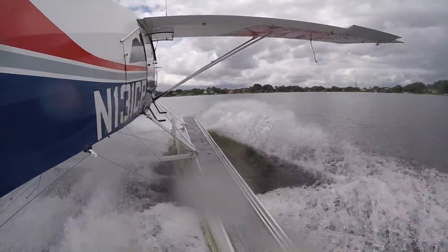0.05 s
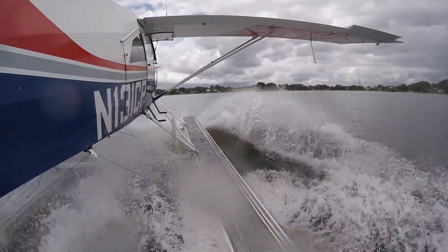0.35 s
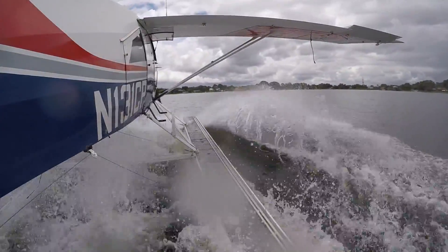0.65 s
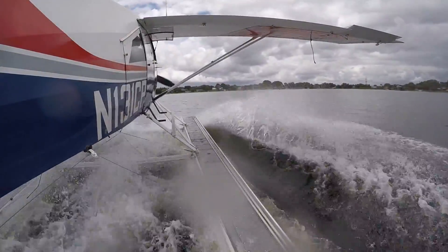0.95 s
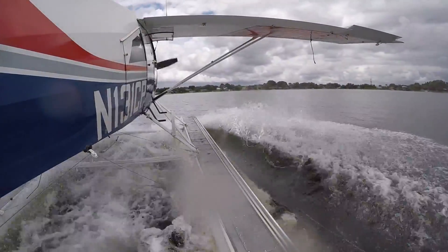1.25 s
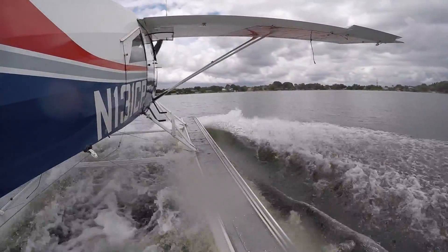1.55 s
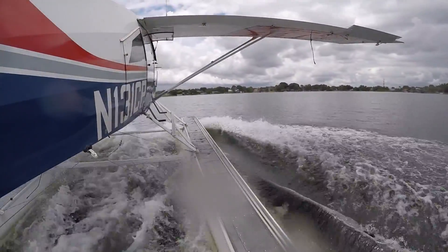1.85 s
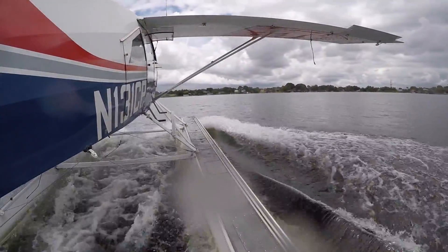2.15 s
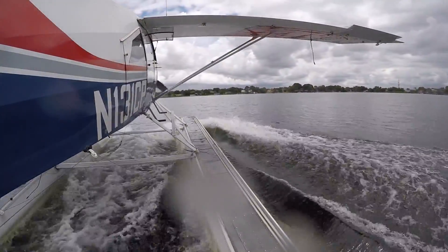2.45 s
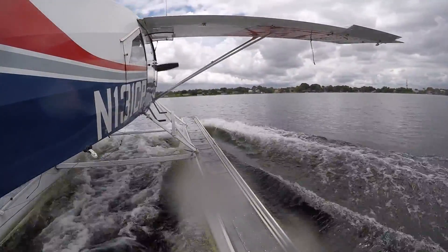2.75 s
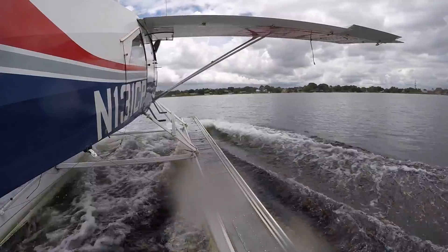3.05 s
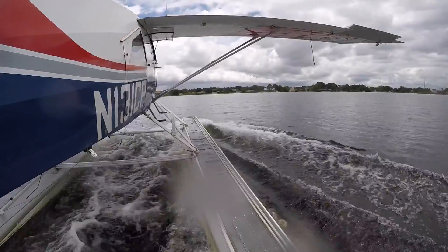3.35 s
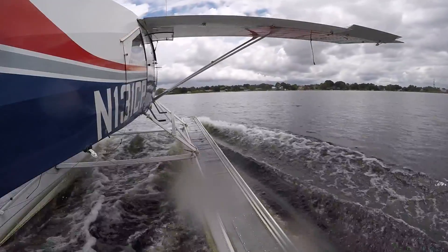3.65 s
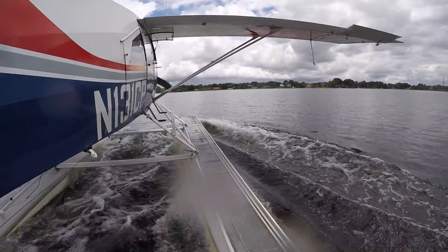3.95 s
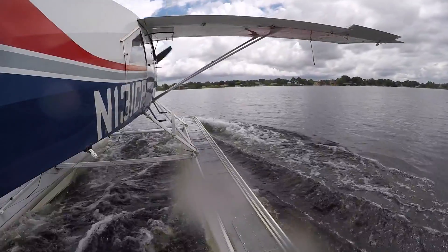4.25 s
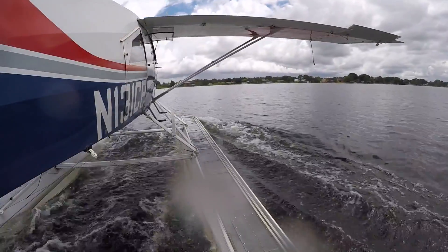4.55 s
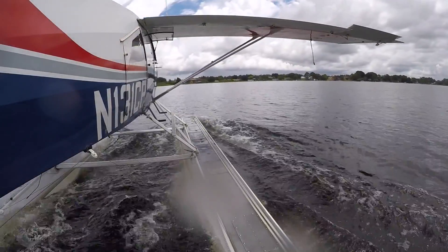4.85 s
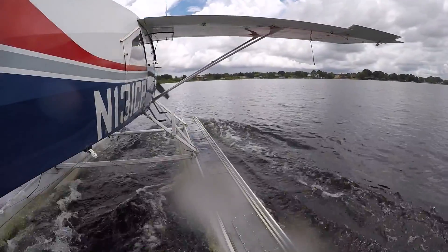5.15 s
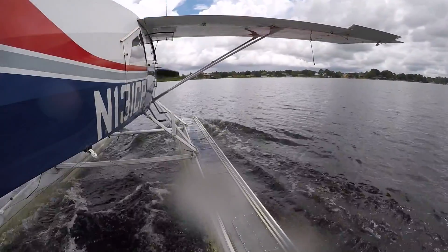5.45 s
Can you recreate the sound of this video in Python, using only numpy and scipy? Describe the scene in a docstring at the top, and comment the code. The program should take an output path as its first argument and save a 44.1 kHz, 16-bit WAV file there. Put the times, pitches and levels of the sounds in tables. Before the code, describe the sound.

A small floatplane skims a lake, heard close from its tail. Spray hisses and water drums on the hollow floats over a low wind rumble. After about a second the spray dies away to a gurgling wash, uncovering the idling piston engine with its throbbing exhaust, dull knocks and metallic valve ticks. Later a hard gust thumps the microphone, followed by a softer one.

```python
"""A floatplane settles on a lake, heard from a camera case on its tail.
First the floats plane: water drums on the hollow hulls, spray hisses off them. From 1.2 s they sink off
the step and the spray dies to a wash, uncovering the idling six-cylinder engine: throbbing exhaust,
dull knocks, valve clatter. Propeller wind buffets the case throughout; near 3.8 s a hard gust thumps
it and the level dips briefly. A softer gust follows at 4.3 s."""
import sys
import numpy as np
from scipy import signal
from scipy.fft import rfft, irfft
from scipy.io import wavfile
from scipy.ndimage import uniform_filter1d, minimum_filter1d

SR = 44100
rng = np.random.default_rng(int(sys.argv[2]) if len(sys.argv) > 2 else 0)


def generate_wav(sig):
    """Save sig (samples, or channels by samples) to the path in sys.argv[1] as 16-bit PCM at SR."""
    pcm = np.round(np.clip(np.atleast_2d(sig).T, -1, 1) * 32767).astype(np.int16)
    wavfile.write(sys.argv[1], SR, pcm)


N = 242991
TIME_S = np.arange(N) / SR
FREQS_HZ = np.fft.rfftfreq(2 * N, 1 / SR)

# Table levels are relative. Spray envelope: t/s, level/dB
SPRAY_FLOW = [(0, -29), (1.15, -30), (1.55, -35), (2.2, -40.5), (3.2, -44), (4.3, -49.5), (5.51, -45.5)]
# Higher sheets of spray: peak t/s, boost/dB, half width/s
SPRAY_SURGES = [(.68, 1.2, .12), (1.24, 2.2, 0.05)]
# Mist and drops: f/Hz, level/dB
SPRAY_SPECTRUM = [(100, -3), (300, -9), (600, -6), (1200, -8.5), (2000, 1), (2700, 4.5), (4000, 3),
                  (5500, -3.5), (7500, -4.5), (10000, -11), (13000, -17), (15500, -18.5)]
# Hollow floats: f/Hz, level/dB
DRUM_SPECTRUM = [(60, -31), (130, 5.5), (190, 0.5), (260, -9), (380, -12), (480, -27), (1000, -36),
                 (3000, -66)]
# Wake envelope: t/s, level/dB
WAKE_FLOW = [(0, -41.5), (1.5, -46.5), (2.8, -48), (4.2, -49), (5.51, -47)]
# Churning water: f/Hz, level/dB
WASH_SPECTRUM = [(100, 0.5), (250, 0), (500, -6.5), (900, -3), (1200, -9.5), (2000, -5.5), (2700, -10.5),
                 (4000, -11.5), (5500, -18.5), (9000, -41), (15500, -54)]
# Engine speed: t/s, speed/rpm
ENGINE_SPEED = [(0, 783.9), (1.3, 782.1), (2.7, 778.6), (4.1, 775.7), (5.5, 780.1)]
# Exhaust and propeller lines: multiple of the four-stroke cycle rate, level/dB
EXHAUST_LINES = [(4, -31.5), (5, -42), (6, -26), (7, -31), (9, -20), (11, -33), (12, -26), (13, -40),
                 (14, -45), (15, -37), (18, -36), (20, -50), (21, -52), (22, -54), (24, -49), (25, -57),
                 (26, -58), (27, -59), (30, -57), (36, -63)]
# Engine knocks: position/cycle, level/dB
KNOCK_PATTERN = [(.15, -1.5), (.265, 1.5), (0.329, -2.5), (0.461, -3), (.555, -8), (.61, -3), (0.684, -5),
                 (.805, -4.5), (0.849, -3.5), (0.982, -4.5)]
# Airframe modes: f/Hz, level/dB, t60/s
AIRFRAME_MODES = [(338, 0, 0.043), (406, 1, 0.045), (408, -4.5, 0.024), (575, -13.5, 0.074),
                  (863, -17.5, 0.075), (980, -15.5, 0.084)]
# Panel buzz: f/Hz, level/dB
PANEL_SPECTRUM = [(200, -33), (290, -11.5), (330, 2.5), (435, 1.5), (470, -21.5), (800, -14), (980, -20.5),
                  (1150, -39)]
# Valve gear blows: position/cycle, level/dB
VALVE_PATTERN = [(0.114, 0), (0.271, 1.5), (.33, 3), (0.448, -1), (0.583, 4), (.635, -11), (.785, -15),
                 (.85, 3), (0.944, 2)]
# Valve clatter: f/Hz, level/dB
CLATTER_SPECTRUM = [(300, -23), (900, -1.5), (1500, -8.5), (2900, -4), (3600, -1.5), (4300, -5.5),
                    (5000, -4), (6500, -12), (8200, -11), (9200, -27.5), (12000, -21.5), (15500, -38)]
# Loose valves: position/cycle, ping level/dB, ping f/Hz, tinkle and click level/dB
TAP_PATTERN = [(.277, -36, 3940, -52), (.612, -40.5, 4110, -57), (.782, -43, 3790, -53)]
# Hardest taps: t/s, ping level/dB, ping f/Hz, tinkle and click level/dB
HARD_TAPS = [(2.2664, -38, 3590, -41), (2.4992, -31, 3990, -54), (2.577, -32, 3940, -43.5),
             (3.0385, -36, 3960, -44), (3.27, -42, 3600, -46), (3.3468, -30, 3880, -52),
             (4.1959, -27.5, 3760, -57), (4.5037, -33.5, 4030, -62), (4.6618, -29, 3990, -58),
             (4.7386, -35, 3680, -55), (4.8135, -33, 3980, -54), (5.1218, -33, 3895, -47)]
# Tap click: f/Hz, level/dB
CLICK_SPECTRUM = [(1000, -38), (4000, -26), (6300, -17), (7400, 5.5), (8400, -10), (9500, 5), (11000, -4),
                  (12500, -16), (15500, -30)]
# Propeller wind: f/Hz, level/dB
BUFFET_SPECTRUM = [(5, -40), (14, -12), (25, -6), (35, -2), (50, 0), (70, -3), (90, -8), (120, -12),
                   (160, -19), (200, -25), (260, -33), (400, -46), (800, -65), (3000, -100)]
# Gusts: peak t/s, level/dB, half width/s
GUSTS = [(3.785, -15.5, 0.077), (4.3, -19, 0.064)]
# Gust rumble: f/Hz, level/dB
GUST_SPECTRUM = [(8, -19), (25, 10), (45, 6), (100, 2), (170, -9), (300, -22.5), (400, -34.5), (700, -64),
                 (3000, -104)]
# Gust thump: f/Hz, level/dB
THUMP_SPECTRUM = [(50, -10), (110, 3), (200, -1), (330, -5), (450, -23), (800, -30), (2000, -63)]
# Case resonances: f/Hz, half width/Hz, gain/dB
CASE_MODES = [(569, 65, 4.5), (857, 26, 4.5), (956, 11, 3), (1374, 43, 3), (2030, 72, 3), (2470, 32, 4),
              (3060, 170, -2.5), (3588, 326, 8), (4108, 330, 9.5), (5030, 280, -1.5), (5730, 190, 1.5),
              (11200, 370, 1.5)]


def spray():
    """Sheets of water tear off the floats into mist and patter back as drops."""
    surge_db = sum(db * swell(s, half_width_s) for s, db, half_width_s in SPRAY_SURGES)
    flow = envelope(SPRAY_FLOW) * gain(surge_db)
    mist = noise(SPRAY_SPECTRUM) * gain(0.93 * drift(rate_hz=18))
    patter = coloured(drops(per_s=2500, spread_db=3), SPRAY_SPECTRUM)
    plinks = bubbles(low_hz=2316, high_hz=8526, per_s=1400, life_cycles=26.4)
    return flow * (gain(-7.5) * mist + gain(-14) * patter + gain(-18.5) * plinks)


def floats(peak_s=0.32, peak_db=-31.5, rise_db_per_s=19, fall_db_per_s=15):
    """Water drums on the hollow floats, swelling, then fading as they slow."""
    since_s = TIME_S - peak_s
    level_db = peak_db + np.minimum(rise_db_per_s * since_s, -fall_db_per_s * since_s)
    return gain(level_db) * noise(DRUM_SPECTRUM)


def wash():
    """The wake churns; large bubbles gurgle, foam fizzes."""
    churn = noise(WASH_SPECTRUM) * gain(0.38 * drift(rate_hz=11))
    gurgle = bubbles(low_hz=702, high_hz=4380, per_s=450, life_cycles=11)
    fizz = bubbles(low_hz=6310, high_hz=8750, per_s=170, life_cycles=40)
    return envelope(WAKE_FLOW) * (churn + gain(-10.5) * gurgle + gain(-14.5) * fizz)


def bubbles(low_hz, high_hz, per_s, life_cycles, sizes=24):
    """Bubbles ring briefly, rising slightly in pitch."""
    sound = np.zeros(N)
    for hz in np.geomspace(low_hz, high_hz, sizes):
        cycles = hz * rng.uniform(0.98, 1.02) * TIME_S[:SR // 20]
        age = cycles / life_cycles
        bubble = (np.exp(-age) - np.exp(-age * 6)) * np.sin(2 * np.pi * cycles * (1 + 0.0055 * age))
        sound += signal.oaconvolve(drops(per_s / sizes, spread_db=3.5), bubble)[:N]
    return unit_rms(sound)


def exhaust(cycles, lag_cycles=0.424, smear_cycles=0.018):
    """Two banks of three cylinders fire in turn; the pipes delay highs more, rounding the pulses."""
    lines = sum(gain(db) * np.cos(2 * np.pi * (k * (cycles - lag_cycles) - smear_cycles * k ** 2))
                for k, db in EXHAUST_LINES)
    return np.sqrt(2) * lines * settle(planing_db=-3, settled_db=1) * gain(0.95 * drift(rate_hz=2.5))


def knocks(cycles, attack_s=0.034):
    """Dull engine blows ring the airframe and buzz its panels."""
    t = TIME_S[:SR // 6]
    modes = sum(gain(db - 60 * t / t60_s) * np.sin(2 * np.pi * hz * t)
                for hz, db, t60_s in AIRFRAME_MODES)
    ring = modes * (1 - np.exp(-t / attack_s))
    blows = each_cycle(cycles, KNOCK_PATTERN, jitter_s=0.0005, uneven_db=2.5)
    ringing = unit_rms(signal.oaconvolve(blows, ring)[:N])
    shaking = rattle(blows, fall_s=0.004, tail_s=0.018, tail_db=-10)
    buzz = coloured(shaking * rng.standard_normal(N), PANEL_SPECTRUM)
    return settle(planing_db=-52, settled_db=-46) * (gain(-7) * ringing + gain(-2.5) * buzz)


def valves(cycles):
    """Rockers and valves clatter in a set order."""
    blows = each_cycle(cycles, VALVE_PATTERN, jitter_s=0.0018, uneven_db=3)
    clatter = rattle(blows, fall_s=0.0089, tail_s=0.047, tail_db=-3.5) * noise(CLATTER_SPECTRUM)
    return settle(planing_db=-47, settled_db=-52.5) * unit_rms(clatter)


def taps(cycles, uneven_db=0.5, tinkle_centre_hz=7970):
    """Loose valves tap each cycle, at times much harder: metallic ping, high tinkle, bright click."""
    soft_taps = [(np.interp(cycle + position, cycles, TIME_S),
                  ping_db + uneven_db * rng.uniform(-1, 1),
                  ping_hz * (1 + 0.0387 * rng.uniform(-0.95, 1)),
                  tinkle_db + uneven_db * rng.uniform(-1, 1))
                 for cycle in range(int(cycles[-1]))
                 for position, ping_db, ping_hz, tinkle_db in TAP_PATTERN]
    ringing, blows = np.zeros(N), np.zeros(N)
    for s, ping_db, ping_hz, tinkle_db in soft_taps + list(HARD_TAPS):
        tinkle_hz = tinkle_centre_hz * (1 + 0.091 * rng.uniform(-0.92, 1))
        ping = steel_ring(ping_hz, fall_s=0.0037, tail_s=0.023, flutter_rad=0.49)
        tinkle = steel_ring(tinkle_hz, fall_s=0.0036, tail_s=0.012, flutter_rad=0.98)
        add(ringing, s, gain(ping_db - 7) * ping + gain(tinkle_db + 1) * tinkle)
        add(blows, s, gain([tinkle_db]))
    click = rattle(blows, fall_s=0.004, tail_s=0.013, tail_db=-11.5) * noise(CLICK_SPECTRUM)
    return ringing + gain(-6.5) * click


def steel_ring(hz, fall_s, tail_s, flutter_rad, attack_s=0.0005):
    """A small steel part rings; phase flutter stands for its close modes."""
    t = TIME_S[:SR // 12]
    shape = (1 - np.exp(-t / attack_s)) ** 2 * decay(t, fall_s, tail_s, tail_db=-15)
    wander = uniform_filter1d(rng.standard_normal(len(t)), size=130)
    wander = unit_rms(uniform_filter1d(wander, size=40))
    return shape * np.sin(2 * np.pi * hz * t + flutter_rad * wander)


def wind(thump_s=3.747):
    """Propeller wake buffets the case; two gusts, the harder landing with a thump."""
    impact = rattle(clicks(np.array([thump_s]), [0]), fall_s=0.014, tail_s=0.05, tail_db=-10)
    thump = coloured(impact * rng.standard_normal(N), THUMP_SPECTRUM)
    buffet = noise(BUFFET_SPECTRUM) * gain(0.57 * drift(rate_hz=3.8))
    gusts = sum(gain(db) * swell(s, half_width_s) for s, db, half_width_s in GUSTS) * noise(GUST_SPECTRUM)
    return settle(planing_db=-19.5, settled_db=-27.5) * buffet + gusts + gain(-49.5) * thump


def settle(planing_db, settled_db, off_step_s=1.177, tau_s=0.88):
    """Gain that holds while the floats plane, then eases as they sink in."""
    planing = np.exp(-np.maximum(TIME_S - off_step_s, 0) / tau_s)
    return gain(settled_db + (planing_db - settled_db) * planing)


def each_cycle(cycles, pattern, jitter_s, uneven_db):
    """Blows repeated each engine cycle, scattered in time and level."""
    position, db = np.transpose(pattern)
    due_cycles = np.arange(int(cycles[-1]) + 1)[:, None] + position
    late, harder = rng.standard_normal((2, *due_cycles.shape))
    times_s = np.interp(due_cycles, cycles, TIME_S, right=2 * TIME_S[-1]) + jitter_s * late
    return clicks(times_s.ravel(), (db + uneven_db * harder).ravel())


def rattle(blows, fall_s, tail_s, tail_db):
    """Envelope of decaying blows, summed in power."""
    shape = decay(TIME_S[:SR // 6], fall_s, tail_s, tail_db)
    return np.sqrt(abs(signal.oaconvolve(blows ** 2, shape ** 2)[:N]))


def decay(t, fall_s, tail_s, tail_db):
    """Sharp fall plus weaker tail."""
    return np.exp(-t / fall_s) + gain(tail_db) * np.exp(-t / tail_s)


def drops(per_s, spread_db):
    """Random impulses, most small, a few large."""
    size = gain(spread_db * np.minimum(rng.exponential(1, N), 5))
    return size * rng.choice([-1, 1], N) * (rng.random(N) < per_s / SR)


def clicks(times_s, db):
    """One impulse per time."""
    samples = np.clip(np.round(times_s * SR).astype(int), 0, N)
    return np.bincount(samples, gain(db), N + 1)[:N]


def noise(spectrum):
    """Shaped noise, rms 1."""
    return coloured(rng.standard_normal(N), spectrum)


def coloured(x, spectrum):
    """x shaped by a spectrum, rms 1."""
    hz, db = np.transpose(spectrum)
    return unit_rms(filtered(x, np.interp(np.log(FREQS_HZ + 1), np.log(hz), db)))


def filtered(x, db):
    """Minimum-phase filter, gain db at FREQS_HZ."""
    log_gain = np.log(gain(np.r_[db, db[-2:0:-1]]))
    phase_rad = -signal.hilbert(log_gain).imag[:len(db)]
    return irfft(rfft(x, 2 * N) * gain(db) * np.exp(1j * phase_rad))[:N]


def drift(rate_hz):
    """Random wander below rate_hz, rms 1."""
    return unit_rms(irfft(rfft(rng.standard_normal(2 * N)) / (1 + (FREQS_HZ / rate_hz) ** 4))[:N])


def swell(peak_s, half_width_s):
    """Gaussian bump, height 1."""
    return np.exp(-((TIME_S - peak_s) / half_width_s) ** 2)


def envelope(points):
    """Gain per sample from t/s, level/dB."""
    return gain(np.interp(TIME_S, *np.transpose(points)))


def add(mix, start_s, sound):
    """Mix in at start_s."""
    part = mix[round(start_s * SR):][:len(sound)]
    part += sound[:len(part)]


def gain(db):
    """dB to amplitude factor."""
    return 10 ** (np.asarray(db) / 20)


def unit_rms(x):
    """Scale to rms 1."""
    return x / np.sqrt(np.mean(x ** 2) + 1e-20)


def scene():
    """Engine, water and wind; two revolutions per engine cycle."""
    cycles = np.cumsum(np.interp(TIME_S, *np.transpose(ENGINE_SPEED))) / (2 * 60 * SR)
    engine = exhaust(cycles) + knocks(cycles) + valves(cycles) + taps(cycles)
    return (engine + spray() + wash() + floats() + wind())[None]


def record(dry, ceiling_db=-7.5, hold_samples=2200, cutoff_hz=15350):
    """Case resonances, limiter on the bass peaks, brief dip after the hard gust, low-pass."""
    case_db = sum(db * np.exp(-((FREQS_HZ - hz) / half_width_hz) ** 2)
                  for hz, half_width_hz, db in CASE_MODES)
    boxed = filtered(dry[0], case_db)
    allowed_gain = np.minimum(1, gain(ceiling_db) / (abs(boxed) + 1e-9))
    limiter = uniform_filter1d(minimum_filter1d(allowed_gain, hold_samples), hold_samples)
    dip = gain(-3.5 * swell(peak_s=3.96, half_width_s=0.13))
    lowpass = signal.firwin(801, cutoff_hz, window=("kaiser", 9), fs=SR)
    return signal.oaconvolve(boxed * limiter * dip, lowpass, "same")[None]


dry = scene()
out = record(dry)
generate_wav(out)
```